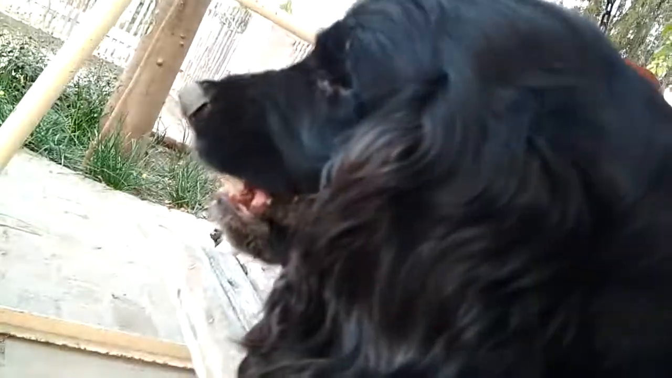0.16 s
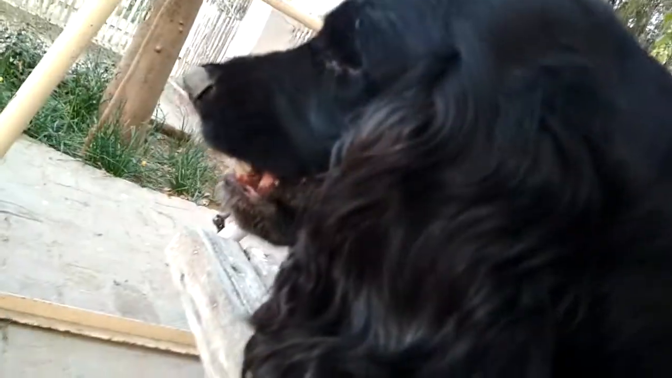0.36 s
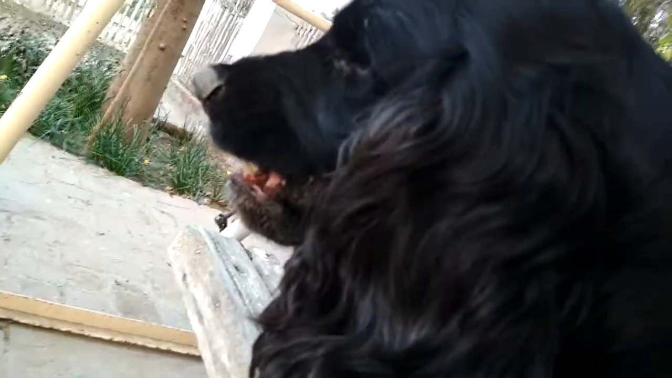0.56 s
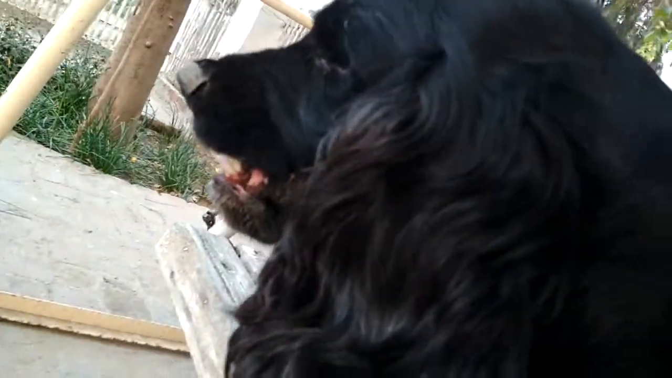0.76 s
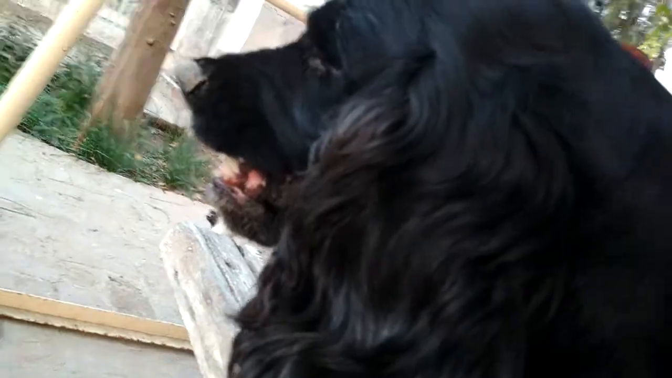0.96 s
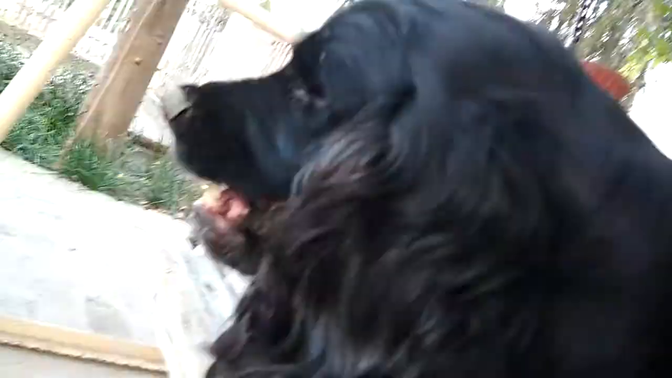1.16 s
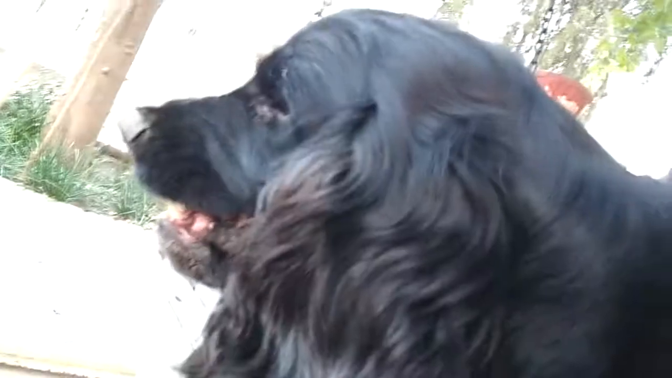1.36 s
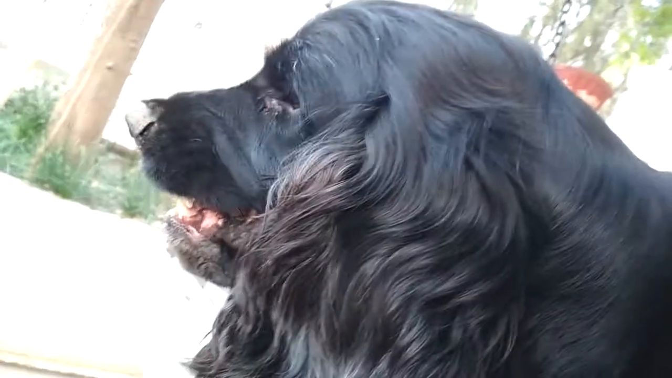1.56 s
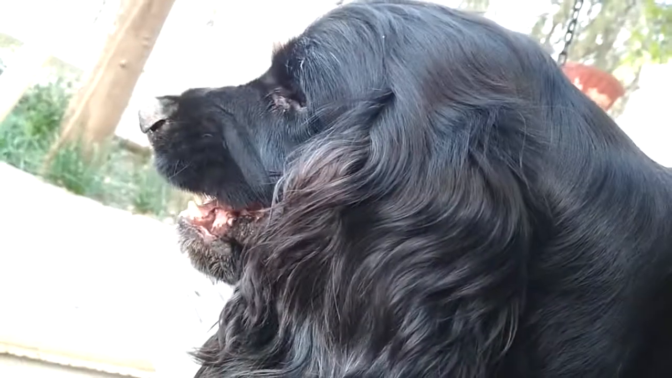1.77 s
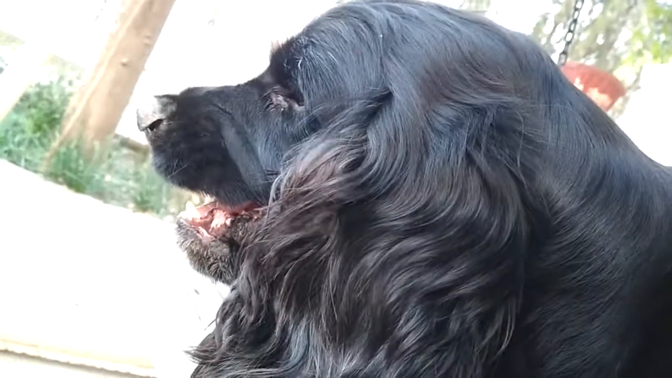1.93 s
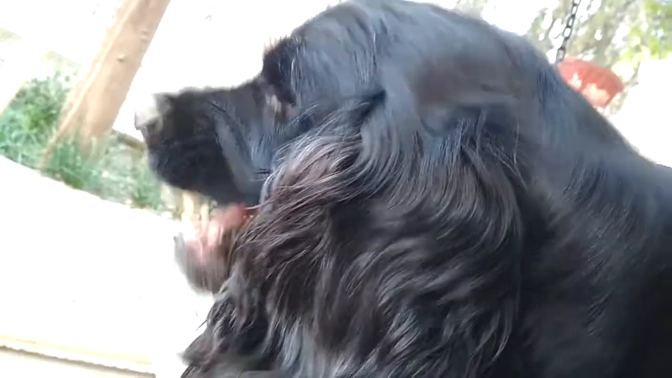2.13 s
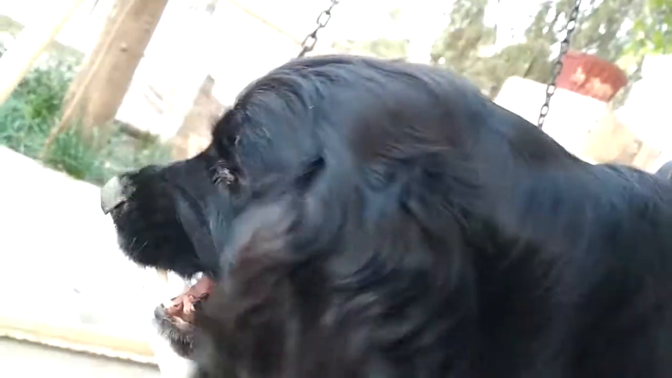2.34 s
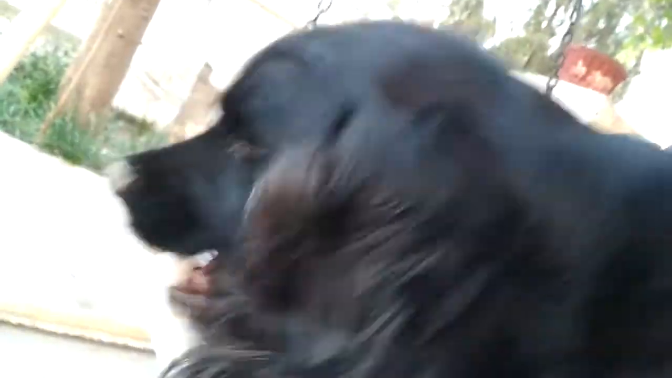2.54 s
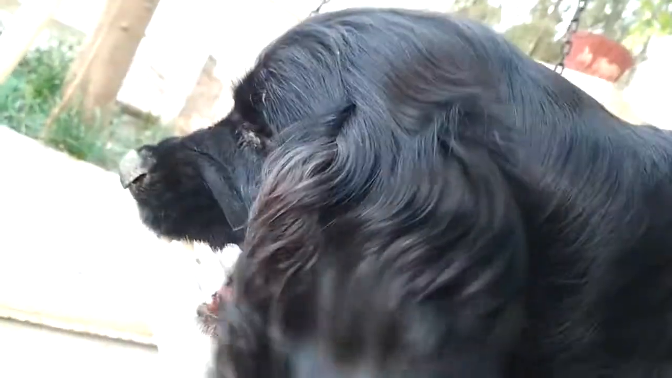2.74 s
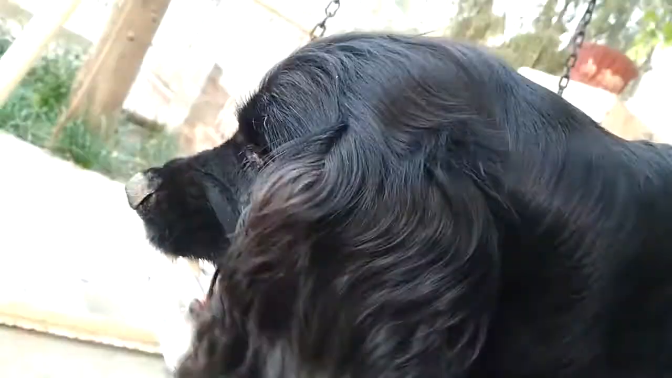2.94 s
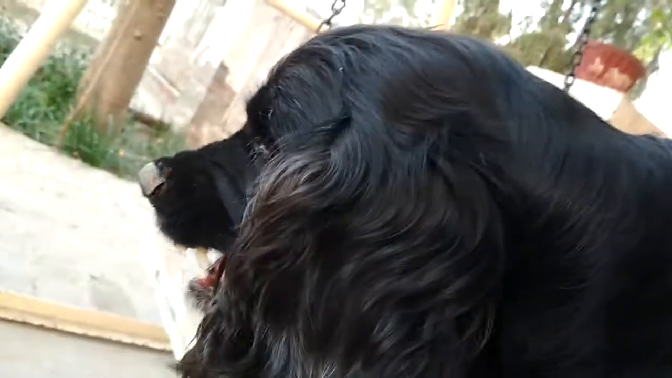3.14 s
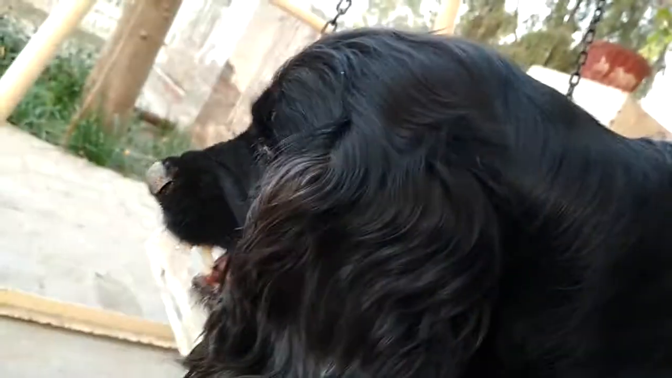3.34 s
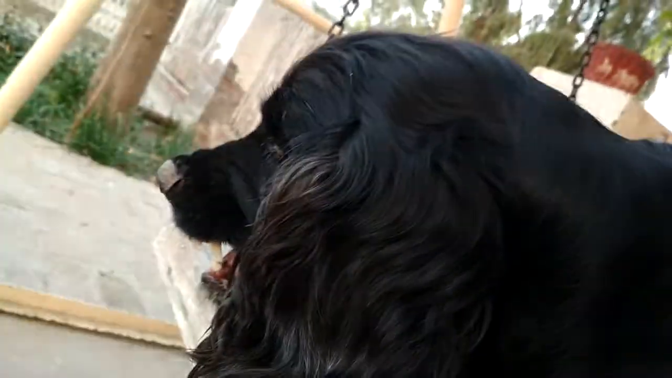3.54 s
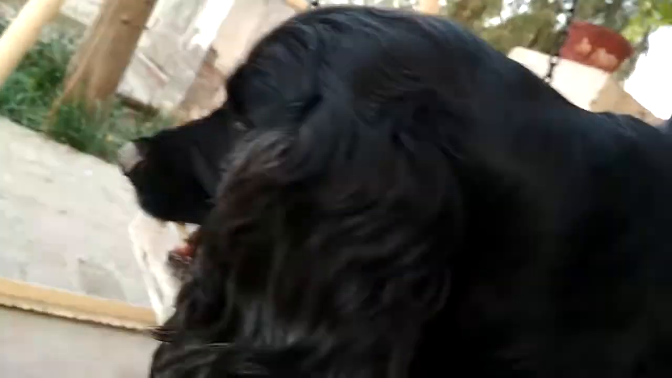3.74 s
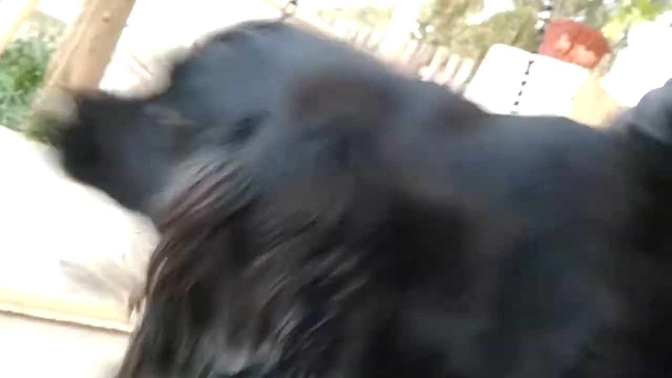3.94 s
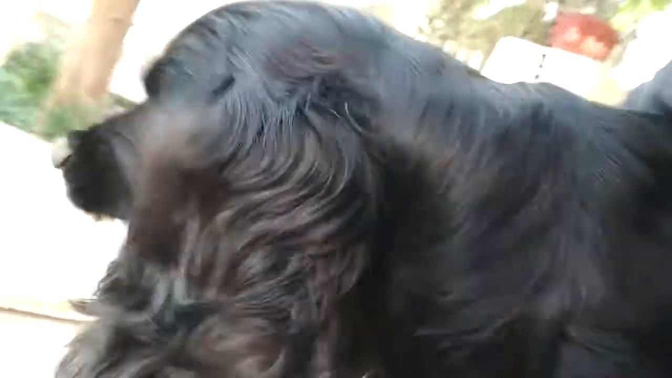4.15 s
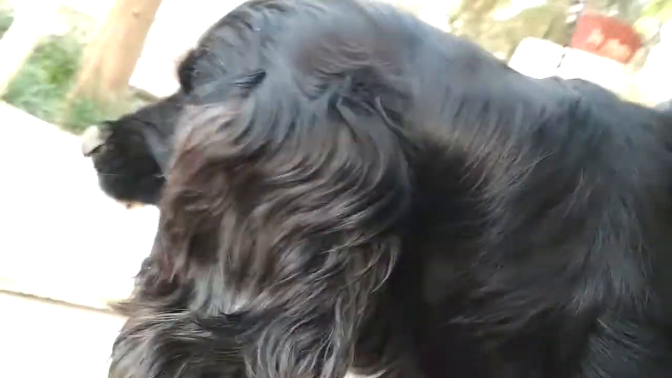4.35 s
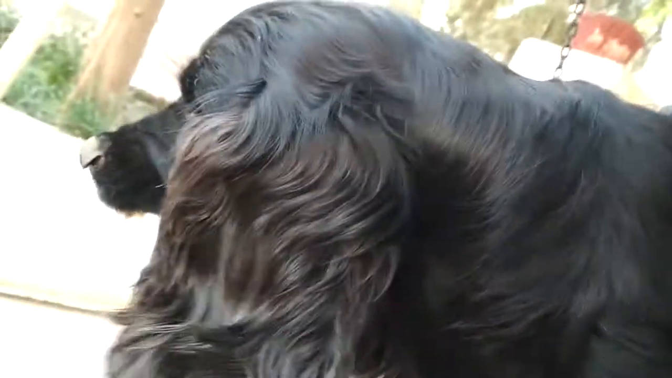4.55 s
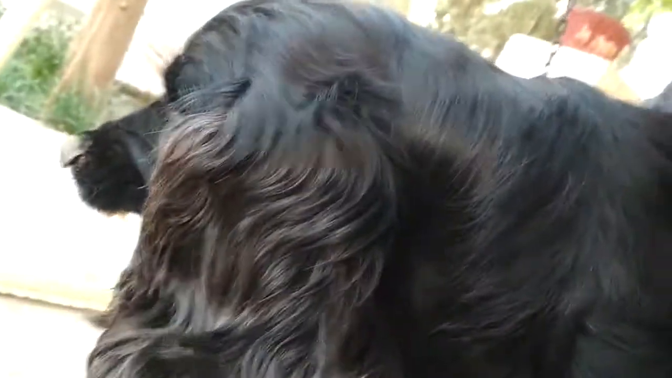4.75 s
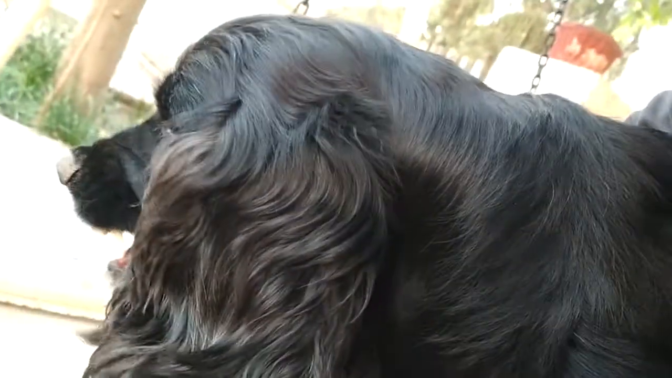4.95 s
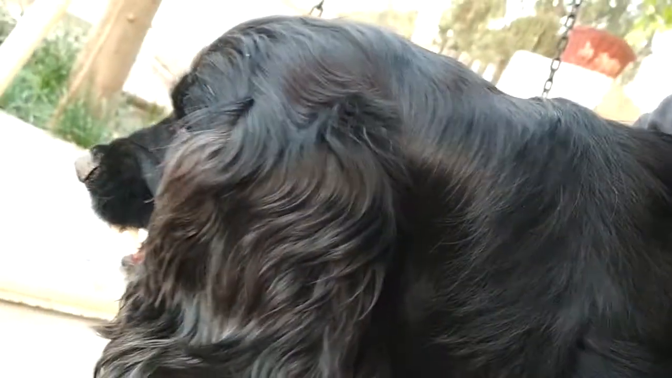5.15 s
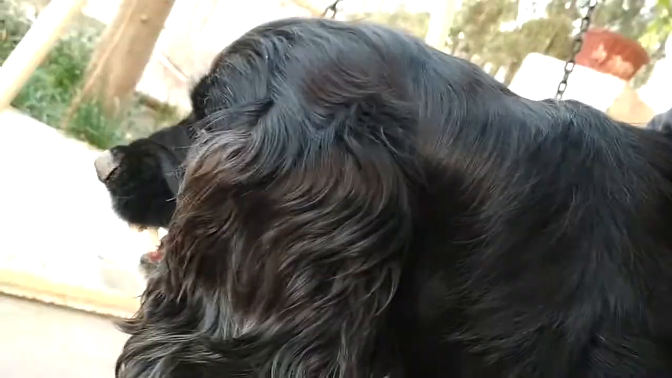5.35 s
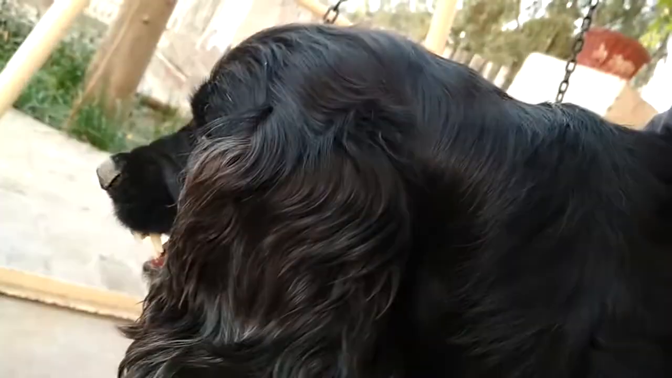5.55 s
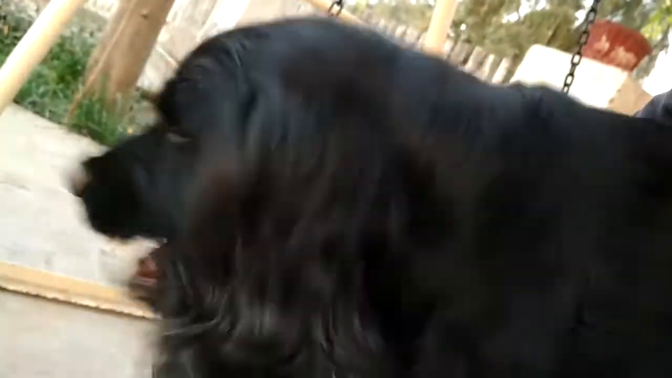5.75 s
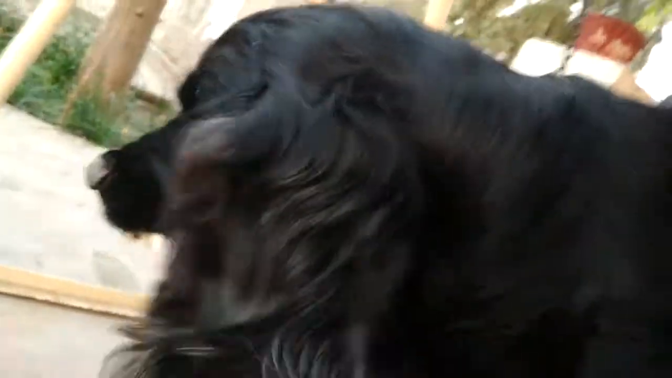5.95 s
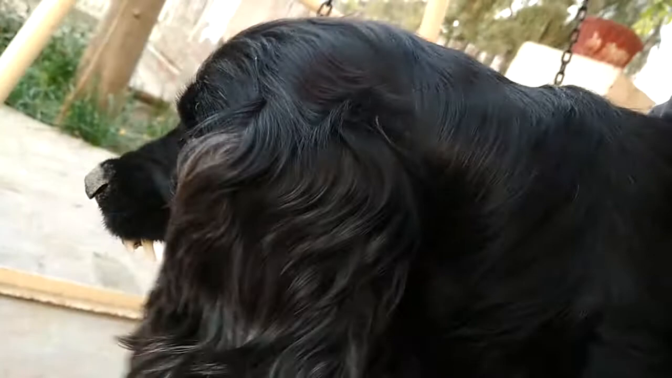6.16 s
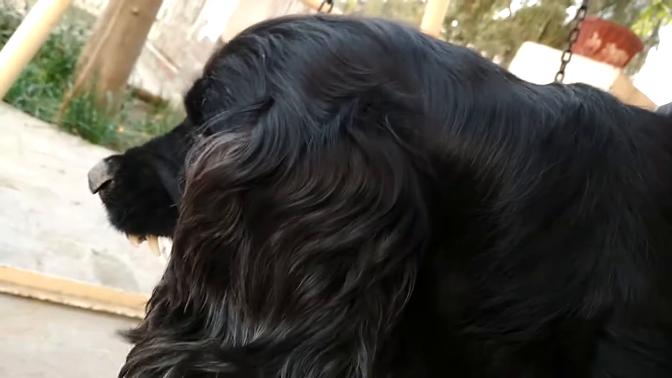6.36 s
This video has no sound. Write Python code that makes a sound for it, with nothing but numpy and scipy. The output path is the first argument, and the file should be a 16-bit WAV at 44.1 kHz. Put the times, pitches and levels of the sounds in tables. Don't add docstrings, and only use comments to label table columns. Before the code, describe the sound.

From 0 to about 1.6 s a dog growls steadily very near the microphone, low and gravelly, its pulses uneven and fluttering, with scattered wet crackles. It dies away with clicks and a tiny lip smack near 1.7 s. From 1.8 s soft palate slaps gather into a swelling snarl, bursting into a hoarse yap at 2.2 s and a sharper, higher one at 2.5 s. Breathy snarling with hiss and clicks follows until 3.0 s. A stronger growl runs from 3.1 to 4.0 s, breaking into a long, high bark that falls in pitch by 4.3 s. A wet snarl fades into hissing breath until 4.9 s. Another growl starts at 5.0 s and leads to a rough long bark at 5.7-6.0 s, then a clicking, crackling snarl to 6.5 s. Short paving echoes, faint distant wash and light wind rumbles surround it.

```python
import sys
import numpy as np
from scipy import signal
from scipy.fft import rfft, irfft, next_fast_len
from scipy.io import wavfile
from scipy.ndimage import uniform_filter1d

SR = 44100
rng = np.random.default_rng(int(sys.argv[2]) if len(sys.argv) > 2 else 0)


def gain_from_db(level_db):
    decades = np.asarray(level_db, float) / 20
    return 10 ** decades


def store_pcm(level_fs):
    pcm = np.round(np.clip(level_fs, -1, 1) * 32767).astype(np.int16)
    wavfile.write(sys.argv[1], SR, np.atleast_2d(pcm).T)


N = 286646
PADDED = next_fast_len(N)

# frequency in Hz, level in dB per Hz.
YARD_SPECTRUM = [(35, -31), (60, -1), (3640, -46), (5040, -32), (14400, -34), (15800, -31)]
# time in seconds, peak in dB, fall in dB per second.
GUSTS = [(.81, -50, 16), (2.04, -52, 44), (2.55, -37.5, 80), (2.88, -29.5, 54), (4.48, -38, 167),
         (5.5, -51, 38), (5.77, -38, 200), (6.23, -33, 147)]

# frequency in Hz, level in dB.
PORT_TILT = [(60, 5), (110, -2), (200, -0.5), (380, 2.5), (700, 0.5), (1290, -4.5), (2380, -0.5),
             (4400, -2.5), (9500, -11), (15000, -12.5)]
# frequency in Hz, lag in radians.
PORT_LAG = [(340, .1), (520, 1.2), (700, 1.6), (870, 1.55), (1050, 2.5), (1300, 3.), (16000, 3.)]
# frequency in Hz, likeness from 0 to 1.
PORT_LIKENESS = [(100, 1), (350, 0.9), (900, 0.96), (1400, 0.72), (2400, 0.51), (3500, 0.15), (16000, 0.11)]
# time in seconds, left over right in dB.
HEAD = [(0., -1.5), (1.5, -0.5), (2.2, 0.5), (3., -1.5), (4.2, -0.5), (5.2, 0), (6.5, 1)]

# time in seconds, peak in
# dB, ring in Hz.
SLAPS = [(1.836, -33.5, 159), (1.892, -24.5, 196), (1.932, -28.5, 234.3), (1.972, -26, 228),
         (2.009, -24.5, 268.8), (2.042, -21.5, 227), (2.08, -21.5, 323), (2.112, -19, 290),
         (2.144, -24, 460), (2.413, -10, 235), (2.814, -23, 184), (4.784, -32.5, 208), (4.829, -38.5, 240),
         (4.903, -34, 248),
         (2.436, -21, 215), (2.46, -13, 194), (2.869, -31, 202), (2.894, -30, 245), (4.401, -23, 180),
          (4.433, -19, 206), (4.473, -16.5, 296), (4.504, -19.5, 340), (4.539, -25, 196), (4.865, -42, 213),
          (6.176, -15.5, 193), (6.189, -16, 310), (6.219, -19.5, 227), (6.244, -25, 264), (6.334, -23, 260)]
# time in seconds, peak in dB, mid band in dB re peak.
CLICKS = [(1.6392, -16, -26), (1.6676, -30, -8), (1.713, -19, -20), (1.8821, -25, -18), (1.9554, -28, -16),
          (2.8384, -15, -17), (4.4129, -18, -10), (4.4293, -19, -17), (4.4473, -15, -19),
          (4.5206, -16, -15), (4.567, -14, -26), (6.1893, -12, -21), (6.2462, -11, -25), (6.2906, -9, -19),
          (6.346, -13, -20), (6.4083, -12, -29), (6.4517, -9, -27)]
# time in seconds, peak in dB, ring in Hz.
CRACKLES = [(0.2169, -30.5, 1580), (0.2488, -39, 2200), (0.2882, -41, 1260), (0.3312, -33, 1580),
            (0.3661, -39, 1330), (0.455, -33.5, 1586), (0.4978, -30.5, 1330), (0.6135, -31, 1300),
            (0.847, -33, 2260), (0.9258, -38, 2210), (1.0036, -31, 2240), (1.0814, -33, 2230),
            (1.2032, -23.5, 2270), (1.5264, -35, 1580), (1.6217, -36, 1590), (2.4548, -26, 2080),
            (2.7502, -31, 1635), (2.7676, -22, 1630), (2.8739, -28, 3440), (3.206, -29.5, 2930),
            (3.2725, -28.5, 2010), (3.3727, -24.5, 1460), (3.518, -36, 1620), (3.677, -30.5, 2680),
            (4.361, -27, 1736), (4.3814, -29, 1500), (4.4115, -20, 1570), (4.4772, -26, 1510),
            (4.513, -29, 1465), (4.5337, -21, 2620), (5.1472, -26, 1520), (5.5636, -32, 1511),
            (5.5835, -21, 2150), (6.1035, -26, 1755), (6.136, -34, 1800), (6.1614, -21, 1830),
            (6.2452, -18, 1500), (6.3158, -12, 1800), (6.345, -22, 1760), (6.4642, -19.5, 1480)]

# frequency in Hz, level in dB per Hz.
TEETH_SPECTRUM = [(4240, -40), (7200, -13.5), (7710, -10.5), (8430, -9), (9680, -8.5), (10500, -4.5),
                  (11200, -1), (11600, -3), (12300, -6), (13400, -6), (15800, -15.5)]
# frequency in Hz, level in dB per Hz.
BREATH_SPECTRUM = [(250, -48), (590, -18), (1000, 7), (1240, 0), (1400, -3), (2280, -4), (4330, -9),
                   (4850, -11.5), (7000, -15), (9100, -20.5), (15400, -120)]
# frequency in Hz, level in dB per Hz.
RASP_SPECTRUM = [(620, -20), (1050, -2.5), (1230, -6), (1910, -13), (2190, -5.5), (3000, -12), (3900, -39),
                 (6600, -120)]

# time in seconds, pitch in Hz, roughness from 0 to 1, voice in dB.
YAPS = [
    [(2.165, 199.5, 0.68, -32), (2.19, 442.3, 0.4, -26), (2.22, 535, 0.21, -26), (2.26, 582.3, 0.04, -21.5),
     (2.29, 528, 0.11, -24), (2.32, 426, 0.39, -22.5), (2.345, 384.5, 0.33, -23.5), (2.4, 269.6, .8, -28)],
    [(2.497, 222, 0.4, -35), (2.508, 327.3, 0.49, -13.5), (2.52, 463, 0.23, -20), (2.54, 771.4, .15, -18.5),
     (2.56, 791.6, 0.2, -23.5), (2.6, 556, 0.32, -26), (2.615, 738.5, 0.33, -21), (2.64, 629, 0.01, -29.5),
     (2.68, 766, 0.53, -36)],
]
# time in seconds, pitch in Hz, roughness from 0 to 1, voice in dB.
BARKS = [
    [(3.995, 699.6, 0.31, -27.5), (4.055, 855.3, 0.55, -23), (4.085, 735.4, 0.2, -25),
     (4.115, 527, 0.18, -18.5), (4.15, 522, .45, -22.5), (4.18, 565.4, 0.33, -23.5), (4.255, 591, 0.2, -25),
     (4.268, 430.5, 0.18, -22.5), (4.305, 376, 0.18, -20.5)],
    [(5.72, 721.3, 0.31, -26), (5.75, 680.6, 0.45, -20.5), (5.782, 835.7, 0.16, -20.5),
     (5.815, 717.3, .35, -24), (5.845, 799.5, 0.34, -20.5), (5.91, 570, 0.44, -26),
     (5.99, 610.5, 0.11, -24), (6.0, 430, 0.1, -21.5), (6.04, 374.6, 0.13, -24)],
]
# multiple of the pitch, level in dB.
OVERTONES = [(2, -1.5), (3, -4), (4, -11.5), (5, -16.5)]
# wide open in seconds, closing in seconds, breath in dB,
# teeth in dB, overtones in dB.
JAWS = [
    (2.179, 2.267, -20, -27, 1),
    (2.513, 2.66, -23.5, -30, -2),
    (4.039, 4.246, -23, -32, -1),
    (5.759, 5.983, -23, -30.5, -2),
]
# time in seconds, surge in dB, undertone at 0.42 of the pitch in
# dB.
SURGES = [
    (2.188, 7, -29),
    (2.509, 1, -40),
    (4.017, 12, -23.5),
    (5.736, 8.5, -25),
]
# time in seconds, depth in dB, half length in seconds.
BREAKS = [(2.232, -3, .004), (2.329, -12, 0.0075), (2.378, -12, 0.005), (2.402, -6, .008),
          (4.113, -8, .005), (4.168, -7, .01), (4.265, -6, .006), (5.83, -8, 0.0051), (5.89, -3, .006),
          (5.952, -10, .007), (5.998, -8, 0.0052)]

# time in seconds, effort in dB, chest drive in dB,
# air through the lips in dB.
LONG_GROWLS = [
    [(0.0, -30.5, -41.5, -52), (0.424, -30.5, -37, -64.5), (1.362, -26.5, -39, -56),
     (1.542, -31.5, -51.5, -65), (1.676, -46.5, -52, -61), (1.73, -62, -62, -65)],
    [(3.05, -61, -27.5, -55), (3.142, -24, -32, -41), (3.648, -28, -27, -43.5), (3.792, -26.5, -41, -57.5),
     (3.966, -30, -40.5, -59), (3.998, -23, -31, -45)],
    [(4.958, -32, -67, -74), (5.009, -20, -54, -44.5), (5.051, -25.5, -58, -39), (5.183, -23, -29, -43),
     (5.597, -27.5, -29, -42), (5.725, -22.5, -38, -54.5)],
]
# time in seconds, effort in dB, chest drive in dB, lip air in dB.
SHORT_GROWLS = [
    [(1.82, -58, -54, -60), (1.866, -50.5, -37, -48), (1.98, -45, -39, -46), (2.098, -38, -37, -38),
     (2.155, -33.5, -45, -38)],
    [(2.38, -28, -46, -37), (2.39, -37.5, -37, -38), (2.424, -23, -30, -29), (2.495, -32.5, -24, -48.5)],
    [(2.68, -29, -41, -31), (2.714, -39.5, -83, -50.5), (2.8, -30.5, -39.5, -28),
     (2.895, -31.5, -36.5, -35), (2.935, -48, -49, -35.5), (3.03, -51.5, -63, -40)],
    [(4.305, -29.5, -57, -36.5), (4.462, -23, -36, -30), (4.55, -27, -42, -28), (4.6, -43.5, -60, -27),
     (4.75, -54.5, -52, -32), (4.93, -56, -62, -57)],
    [(6.04, -32, -70, -41.5), (6.14, -25.5, -36, -28), (6.2, -23, -30, -25), (6.448, -31.5, -59, -25),
     (6.5, -34, -31, -24)],
]
# time in seconds, gape in dB, tongue lift in dB.
GAPE = [(.05, -2.5, 1.5), (.5, 0, -4.5), (1.05, 6, -4.5), (1.45, 0.3, 6), (1.7, -1.5, -2), (1.9, 11, -9.5),
        (2.15, 2, -2.5), (2.75, 4, -2), (3.03, 9, -1), (3.15, -5.5, -5.5), (3.9, 1, 1.5), (4.5, 0.5, 3.5),
        (4.9, 8.5, 4.5), (4.97, -18.5, 10), (5.17, -4, -4.5), (5.7, 3, -4.5), (6.1, -1.5, -3),
        (6.45, 0.5, -3.5)]
# time in seconds, fold pitch in Hz, throat in Hz, mouth in Hz.
AIRWAY = [(0.0, 114, 647, 1680), (0.2, 96.56, 679, 1593), (0.5, 93.15, 672, 1600), (1.3, 108, 728, 2320),
          (1.85, 87.61, 744, 1480), (2.19, 115.2, 622, 1980), (2.51, 119.8, 662, 1550),
          (2.57, 99.28, 690, 1622), (3.06, 91.16, 823, 1749), (3.09, 101.8, 700, 1527),
          (4.36, 116.2, 757, 1566), (4.45, 87.26, 763, 1600), (4.69, 123, 718, 1850),
          (5.32, 109.5, 695, 1776), (6.5, 116.9, 769, 1702)]
# time in seconds, peak in dB.
JOLTS = [(0.059, -13.5), (0.112, -32), (0.164, -15.5), (0.217, -15), (0.363, -19.5), (0.445, -14.5),
         (0.529, -18), (0.646, -24), (0.732, -31), (0.926, -21), (0.964, -22), (0.994, -25), (1.111, -15.5),
         (1.354, -18.5), (1.873, -35.5), (1.992, -29), (2.031, -24.5), (2.064, -24), (2.098, -27),
         (2.125, -29), (2.418, -20.5), (2.794, -22), (2.816, -16), (2.872, -23), (3.139, -22),
         (3.167, -12.5), (3.192, -14), (3.301, -19), (3.344, -11.5), (3.375, -19), (3.42, -11),
         (3.792, -26), (3.878, -15), (4.358, -16), (4.456, -24), (4.535, -17), (4.958, -27), (5.056, -7),
         (5.127, -21), (5.148, -14), (5.183, -19), (5.233, -23), (5.527, -22), (6.065, -19.5), (6.189, -14),
         (6.277, -16), (6.358, -14.5), (6.432, -24), (6.467, -14)]
# start in seconds, end in seconds, frequency in Hz, width in Hz.
NOTCHES = [(-0.1, 1.3, 1690, 440), (5, 5.72, 15150, 3000), (3.5, 4.92, 6940, 1400), (2.5, 3.6, 12000, 1500),
           (2.79, 3.03, 6050, 600), (2.9, 3.1, 4700, 500), (3.5, 4.06, 4700, 430), (5, 4.95, 2470, 420),
           (4, 4.9, 1260, 420), (5., 5.72, 4220, 1700), (6, 6.14, 2790, 850), (6, 6.3, 2660, 500),
           (6, 6.5, 2660, 500), (1.1, 2.12, 2900, 420), (0, 1.7, 11000, 530), (0.6, 1.3, 4700, 880),
           (0, .15, 2660, 630), (6, 6.5, 5970, 610), (6.1, 6.7, 4090, 350)]

# share of effort, of chest drive, of lip air, of gape,
# of tongue lift, offset in dB.
CHEST_LAW = (0.59, .4, 0.003, -0.41, 0.13, -2.05)
RASP_LAW = (0.83, 0, 0.43, 1, 0, -5)
CHEEK_LAW = (0.53, 0, 0.39, 0.95, -1, -23.5)
TONGUE_LAW = (0.5, 0, 0.67, 1.03, 0.49, -9.5)

YARD_DB = -58
FLUTTER_HZ = 26.33
JAW_SHUT_DB, CLOSING_DB, CLOSING_S = -22, -11, 0.08
BREATH_SAG_DB, TEETH_SAG_DB = -9.5, -10
FALSETTO_HZ, FALSETTO_DB_PER_HZ = 606, -0.0008
LOW_END_HZ, LOW_END_DB = 450, 0.5
SURGE_S, UNDERTONE_S, BARK_THROAT_HZ = 0.021, 0.015, 725
HUSH_S, HUSH = 0.0075, 0.37
CLICK_S, CRACKLE_S, CRACKLE_DB = 0.0014, 0.0055, 1.5
SMACK_S, SMACK_DB, SMACK_HZ, SMACK_LENGTH_S = 1.683, -41.5, 2480, 0.016


def evened(x, size=9000):
    mid = x.mean(0) if x.ndim > 1 else x
    return x / np.sqrt(abs(uniform_filter1d(mid ** 2, size)) + 1e-20)


def read(points, hz):
    f, value = np.transpose(points)
    return np.interp(np.log(hz + 1), np.log(f + 1), value)


def columns(tables, fade=0.0041, rise=0.005):
    t = np.arange(N) / SR
    s, *values = np.transpose(np.concatenate(tables))
    gate = 0
    for rows in tables:
        start, end = rows[0][0], rows[-1][0]
        gate = gate + np.clip(np.minimum((t - start) / rise, (end - t) / fade) + 1, 0, 1)
    return [np.minimum(gate, 1)] + [np.interp(t, s, v) for v in values]


def wander(hz):
    x = signal.lfilter(*signal.butter(2, hz, fs=SR), rng.standard_normal(N))
    return x / x.std()


def resonate(x, hz, width):
    turn = np.exp(2j * np.pi * np.cumsum(hz * np.ones(len(x))) / SR)
    r = np.exp(-np.pi * width / SR)
    smooth = signal.lfilter([(1 - r) ** 2], [1, -2 * r, r * r], x / turn)
    return 2 * (turn * smooth).real


def coloured(x, points):
    gain = gain_from_db(read(points, np.fft.rfftfreq(PADDED, 1 / SR)))
    return irfft(rfft(x, PADDED) * gain, PADDED)[:N]


def ports(x, other):
    bins = np.fft.rfftfreq(PADDED, 1 / SR)
    half_tilt = gain_from_db(read(PORT_TILT, bins) / 2)
    like = np.clip(read(PORT_LIKENESS, bins), 0, 1)
    late = np.exp(-1j * read(PORT_LAG, bins))
    near, far = rfft(x, PADDED), rfft(other, PADDED)
    left = like * near * late + np.sqrt(1 - like ** 2) * far
    return irfft(np.array([half_tilt * left, near / half_tilt]), PADDED)[:, :N]


def air(gain_db, shape):
    return evened(ports(*(shape(n * gain_from_db(gain_db)) for n in rng.standard_normal((2, N)))))


def yard():
    wash = np.array([coloured(rng.standard_normal(N), YARD_SPECTRUM) for _ in range(2)])
    gusts = [resonate(rng.standard_normal(N), 52, 60) * gain_from_db(3 * wander(9)) for _ in range(2)]
    wind = np.array([1.3 * gusts[0] + 0.2 * gusts[1], 0.8 * gusts[1] + 0.15 * gusts[0]])
    t = np.arange(N) / SR
    gust_db = np.max([db - fall_db * abs(t - s) for s, db, fall_db in GUSTS], axis=0)
    return gain_from_db(YARD_DB - 3.5) * evened(wash) + gain_from_db(gust_db - 5) * evened(wind, size=20000)


def paving(x, wet_db, t60):
    t = np.arange(4000) / SR
    taps = rng.choice([-1., 1.], (2, 4000)) * (rng.random((2, 4000)) < 0.05)
    taps = taps * gain_from_db(-60 * t / t60) * (t > 0.002)
    return x + gain_from_db(wet_db) * signal.fftconvolve(x, taps / np.linalg.norm(taps[0]), axes=1)[:, :N]


def lips():
    swell = np.exp(-((np.arange(N) / SR - SMACK_S) / SMACK_LENGTH_S) ** 2)
    return gain_from_db(SMACK_DB) * swell * air(6.5 * wander(280), lambda n: resonate(n, SMACK_HZ, 950))


def smacks():
    low, high, t = np.zeros(N), np.zeros((2, N)), np.arange(700) / SR
    for s, db, hz in SLAPS:
        at = round(s * SR)
        low[at:at + len(t)] -= gain_from_db(db) * np.sin(2 * np.pi * hz * t) * np.exp(-((t - 0.004) / 0.0017) ** 2)
    for s, db, mid_db in CLICKS:
        at = round(s * SR)
        bursts = rng.standard_normal((4, len(t))) * np.exp(-t / CLICK_S)
        for port in range(2):
            bright = resonate(bursts[port], 11700, 2000)
            dull = resonate(bursts[port + 2], 2540, 2700)
            click = bright / abs(bright).max() + gain_from_db(mid_db) * dull / abs(dull).max()
            high[port, at:at + len(t)] += gain_from_db(db) * click
    return ports(low, low) + gain_from_db(-1.5) * ports(*high)


def crackles():
    out, t = np.zeros((2, N)), np.arange(1200) / SR
    envelope = np.minimum(t / 0.00084, 1) * np.exp(-t / CRACKLE_S)
    bursts = rng.standard_normal((len(CRACKLES), 2, len(t))) * envelope
    for (s, db, hz), burst in zip(CRACKLES, bursts):
        for port in range(2):
            ring = resonate(burst[port], hz, 800)
            ring = ring + 0.27 * resonate(burst[port], 3300, 1500) + 0.07 * resonate(burst[port], 6200, 2500)
            out[port, round(s * SR):][:len(t)] += gain_from_db(db + CRACKLE_DB) * ring / abs(ring).max()
    return ports(*out)


def flutter(depth_db, sharp):
    turns = np.cumsum(FLUTTER_HZ * (1 + 0.12 * wander(12))) / SR
    shut = (0.5 + 0.5 * np.cos(2 * np.pi * turns)) ** sharp
    return -depth_db * shut * np.clip(1 + 0.77 * wander(8), 0, 2)


def controls():
    return columns(sorted(LONG_GROWLS + SHORT_GROWLS), fade=0.016) + columns([GAPE])[1:]


def layer_db(law, drives):
    return law[-1] + sum(share * db for share, db in zip(law, drives[1:]))


def jaw_db(column, sag_db):
    tables = []
    for bark, jaw in zip(YAPS + BARKS, JAWS):
        wide_s, closing_s, peak_db = jaw[0], jaw[1], jaw[column]
        tables.append([(bark[0][0], peak_db + JAW_SHUT_DB),
                       (wide_s, peak_db),
                       (closing_s, peak_db + sag_db),
                       (closing_s + CLOSING_S, peak_db + sag_db + CLOSING_DB)])
    return columns(tables)[1]


def teeth(flap, drives):
    gate, lips_db, barking = drives[0], drives[3], columns(YAPS + BARKS)[0]
    cheek_db, tongue_db = layer_db(CHEEK_LAW, drives), layer_db(TONGUE_LAW, drives)
    bubbles = rng.exponential(1, N) * (rng.random(N) < 70 / SR)
    bursts_db = np.minimum(signal.lfilter([4], [1, -np.exp(-1 / (0.003 * SR))], bubbles), 16)
    spit_db = 3.9 * flap + 2.73 * wander(83) + bursts_db
    peak_hz = 11300 * (1 + 0.03 * wander(9))
    peak_gain = gain_from_db(5.4 * flap[::-1])
    drawn = np.clip((lips_db + 40) / 7, 0, 1)
    bared = 1 + 0.07 * drawn

    def edge(n):
        return coloured(n + resonate(n, peak_hz, 900) * peak_gain, TEETH_SPECTRUM)

    def cheek_cavity(n):
        return resonate(n, 5600 * bared, 800) - resonate(n, 6700 * bared, 1700)

    def tongue_cavity(n):
        front = resonate(n, 3100 * bared, 730) - resonate(n, 3800 * bared, 560)
        return front + (0.5 + 0.099 * drawn) * resonate(n, 4750 * bared, 820)

    chopped = air(spit_db, edge)
    cheek = air(0.35 * spit_db + 2.9 * wander(38), cheek_cavity)
    tongue = air(0.4 * spit_db + 2.65 * wander(40), tongue_cavity)
    blown = air(2 * wander(150), lambda n: coloured(n, TEETH_SPECTRUM))
    snarl = gain_from_db(lips_db) * chopped + gain_from_db(cheek_db) * cheek + gain_from_db(tongue_db) * tongue
    return gate * snarl + barking * gain_from_db(jaw_db(column=3, sag_db=TEETH_SAG_DB)) * blown


def barks():
    gate, hz, rough, voice_db = columns(YAPS + BARKS)
    t = np.arange(N) / SR
    overtones_db = jaw_db(column=4, sag_db=1.5) + FALSETTO_DB_PER_HZ * np.maximum(hz - FALSETTO_HZ, 0)
    overtones_db += LOW_END_DB * np.clip((LOW_END_HZ - hz) / 60, 0, 1) * (t > 3)
    turns = np.cumsum(hz * (1 + (0.012 + 0.24 * rough) * wander(160))) / SR
    shake = gain_from_db(2.6 * rough * wander(160) + 0.6 * wander(70))
    broken = wander(51)

    upper = np.zeros(N)
    for k, db in OVERTONES:
        level = gain_from_db(db + overtones_db + 2.6 * np.roll(broken, 5000 * k))
        jitter = (0.25 + 1.5 * rough) * np.roll(broken, -3000 * k)
        upper += level * np.cos(2 * np.pi * k * turns + jitter)
    upper *= shake ** 1.36 * gain_from_db(-1.5)
    tone = shake * np.cos(2 * np.pi * turns) + upper
    tone += 0.85 * resonate(tone, BARK_THROAT_HZ, 400)

    surge_db, slam = np.zeros(N), np.zeros(N)
    for s, db, under_db in SURGES:
        surge_db += db * np.clip((t - s) / 0.0014 + 0.5, 0, 1) * np.exp(-abs(t - s) / SURGE_S)
        slam += gain_from_db(under_db) * np.exp(-((t - s) / UNDERTONE_S) ** 2)
    for s, db, half in BREAKS:
        surge_db += db * np.exp(-((t - s) / half) ** 2)
    under = slam * np.cos(0.42 * 2 * np.pi * turns)
    under += gain_from_db(voice_db - 9.5) * np.clip(rough, 0, 1) * shake * np.cos(np.pi * turns + 1.5 * broken)

    mouth_hz = 2600 * (1 + 0.12 * broken)
    breath = air(-9 * (turns % 1) + 2.03 * wander(90),
                 lambda n: coloured(n + 1.37 * resonate(n, mouth_hz, 500), BREATH_SPECTRUM))
    voice = gain_from_db(voice_db + surge_db + 3) * ports(tone, upper) + ports(under, under)
    return gate * (voice + gain_from_db(jaw_db(column=2, sag_db=BREATH_SAG_DB)) * breath)


def growl(flap, drives):
    gate, effort_db, hum_db, *_ = drives
    chest_db, rasp_db = layer_db(CHEST_LAW, drives), layer_db(RASP_LAW, drives)
    _, fold_hz, throat_hz, mouth_hz = columns([AIRWAY])
    turns = np.cumsum(fold_hz * (1 + 0.08 * wander(60) + 0.045 * wander(15))) / SR
    pulses = np.diff(np.floor(turns), prepend=0) * gain_from_db(2.2 * wander(150) + 3.5 * flap)
    puff_db = -18 * (turns % 1) + 5.2 * flap + 1.6 * wander(90)
    puffs = rng.standard_normal(N) * gain_from_db(0.3 * puff_db + 7 * flap)
    drive = evened(pulses) + 0.62 * evened(puffs)

    throat = resonate(drive, throat_hz * (1 + 0.022 * wander(25)), 113)
    # gain, ratio to the throat, width in Hz
    for gain, ratio, width in [(0.19, 0.926, 180), (0.11, 1.133, 140), (0.12, 0.797, 190), (0.027, 1.61, 450)]:
        throat += gain * resonate(drive, ratio * throat_hz, width)
    chest = resonate(drive, 211.6, 178) + 0.31 * resonate(drive, 248, 240)
    rasp = air(puff_db + 2.7 * flap + 2.4 * wander(30),
               lambda n: coloured(n + 1.78 * resonate(n, mouth_hz, 450), RASP_SPECTRUM))
    hum_turns = np.cumsum(fold_hz * (1 + 0.045 * wander(18))) / SR
    hum = np.cos(2 * np.pi * hum_turns) * gain_from_db(4.5 * wander(11) + 4 * flap)

    jolts, hush, t = np.zeros(N), np.ones(N), np.arange(900) / SR
    swell = (t / 0.0037 * np.exp(1 - t / 0.0038)) ** 2
    for s, db in JOLTS:
        at = round(s * SR)
        jolts[at:at + len(t)] += gain_from_db(db) * np.sin(2 * np.pi * throat_hz[at] * t) * swell
        hush[at - len(t) // 2:][:len(t)] *= 1 - HUSH * np.exp(-((t - t.mean()) / HUSH_S) ** 2)

    voice = hush * gain_from_db(effort_db) * evened(ports(throat, throat[::-1]))
    voice += gain_from_db(chest_db) * evened(ports(chest, chest[::-1]))
    voice += gain_from_db(rasp_db) * rasp
    voice += gain_from_db(hum_db) * evened(ports(hum, hum[::-1]))
    return gate * voice + gain_from_db(-2.5) * ports(jolts, jolts)


def notches(x):
    out, shifting = x.copy(), wander(13)
    for start, end, hz, width in NOTCHES:
        part = slice(round(start * SR), round(end * SR))
        t = np.arange(N)[part] / SR
        shift = np.roll(shifting, round(hz))[part]
        opened = np.clip(np.minimum(t - start, end + 0.01 - t) / 0.02, 0, 1)
        opened = opened * np.clip(0.95 + 0.25 * shift, 0, 1)
        notch_hz = hz + 0.2 * width * shift[::-1]
        for port in out:
            band = resonate(port[part][::-1], notch_hz[::-1], width)[::-1]
            port[part] -= opened * resonate(band, notch_hz, width)
    return out


def scene():
    flap, drives = flutter(0.73, 0.86), controls()
    dog = growl(flap, drives) + teeth(flap, drives) + barks() + smacks() + lips() + crackles()
    dog = signal.sosfilt(signal.butter(2, 62, "high", fs=SR, output="sos"), dog)
    dog = dog * gain_from_db(np.outer([0.5, -0.5], columns([HEAD])[1]))
    return notches(paving(dog, wet_db=-15, t60=0.08) + yard())


def band_limit(x):
    return signal.sosfilt(signal.butter(12, 16850, fs=SR, output="sos"), x)


def record(dry):
    _, _, z = signal.stft(0.85 * np.tanh(dry / 0.85), SR, nperseg=1024, noverlap=768)

    bands = (abs(z[:, 24:368]) ** 2).mean(0).reshape(43, 8, -1).mean(1)
    band_db = 10 * np.log10(abs(uniform_filter1d(bands, size=10, axis=1)) + 1e-20)
    excess_db = band_db - uniform_filter1d(band_db, size=11, axis=0)
    whim_db = 1.5 * np.sqrt(14) * uniform_filter1d(rng.standard_normal(bands.shape), size=14, axis=1)
    growl_power = (abs(z[:, 12:22]) ** 2).mean((0, 1))
    growl_db = 10 * np.log10(abs(uniform_filter1d(growl_power, size=10)) + 1e-20)
    masked = (band_db + whim_db < growl_db - 43) & (np.arange(43) > 33)[:, None]
    emptied = (excess_db + whim_db < -3.8) | masked
    z[:, 24:368] *= np.repeat(gain_from_db(-28 * emptied), 8, axis=0)

    lines = uniform_filter1d((abs(z[:, 26:190]) ** 2).mean(0), size=7, axis=1)
    lines = abs(uniform_filter1d(lines, size=3, axis=0)) + 1e-20
    weak_db = 10 * np.log10(lines / uniform_filter1d(lines, size=17, axis=0))
    z[:, 26:190] *= gain_from_db(0.7 + np.clip(2.5 * (weak_db + 1), -14, 0))

    z[:, 368:372] *= gain_from_db(-28 * masked[-1])
    z[:, 372:] *= gain_from_db(-45)
    mix = signal.istft(z, SR, nperseg=1024, noverlap=768)[1][:, :N]
    return band_limit(mix)


dry = scene()
out = record(dry)
store_pcm(out)
```